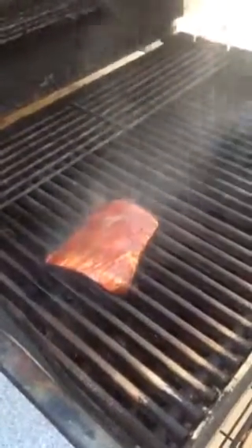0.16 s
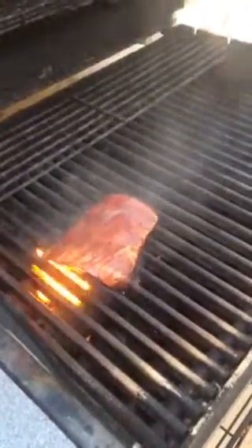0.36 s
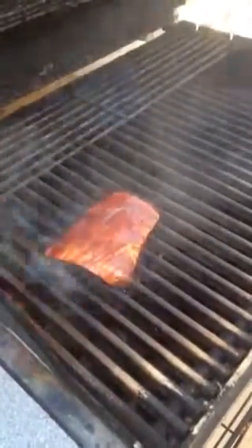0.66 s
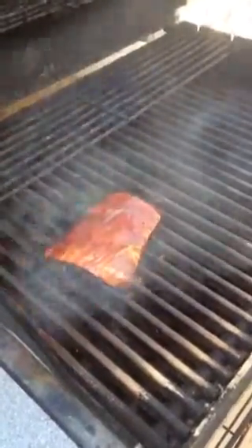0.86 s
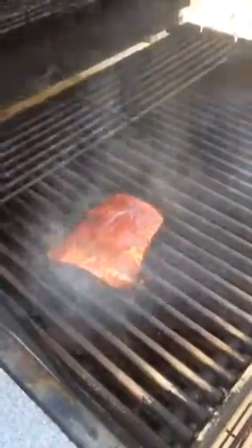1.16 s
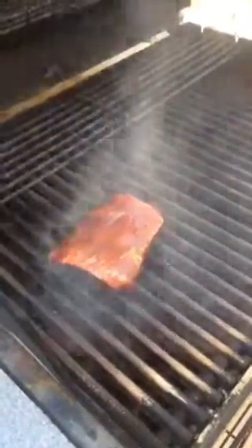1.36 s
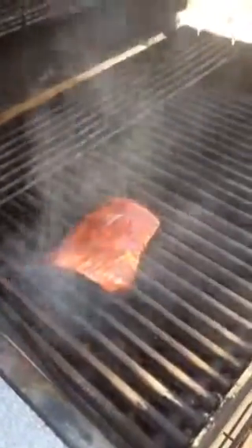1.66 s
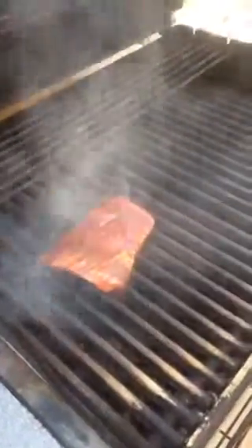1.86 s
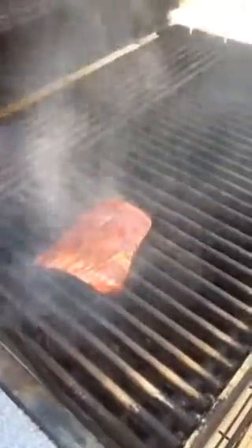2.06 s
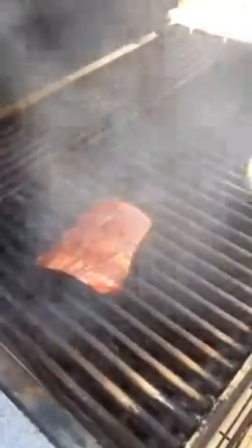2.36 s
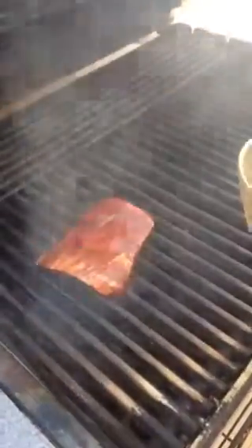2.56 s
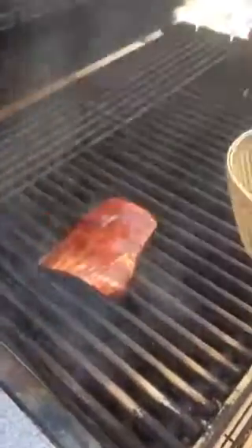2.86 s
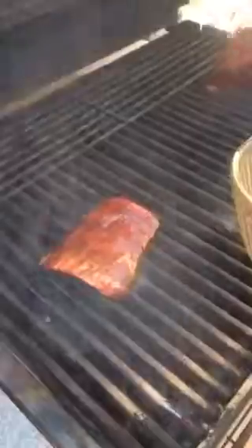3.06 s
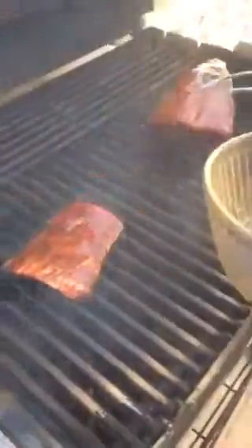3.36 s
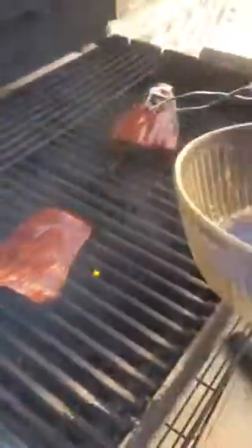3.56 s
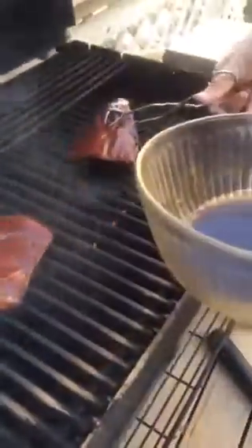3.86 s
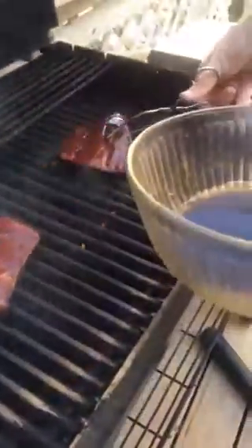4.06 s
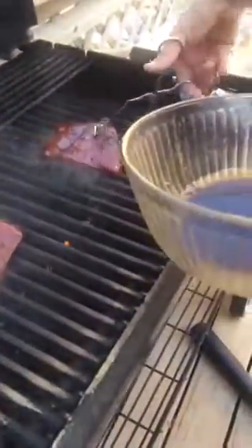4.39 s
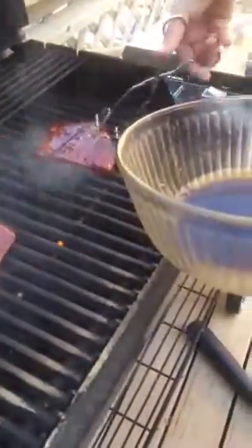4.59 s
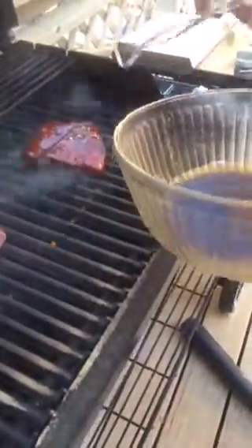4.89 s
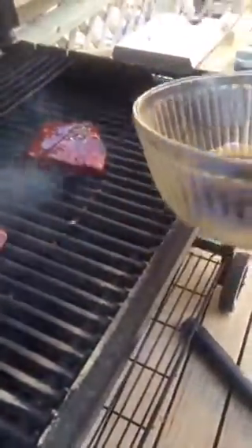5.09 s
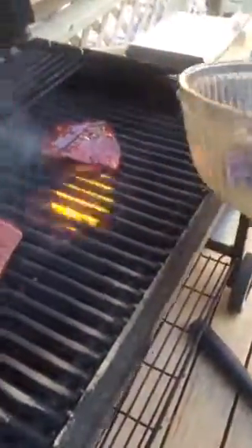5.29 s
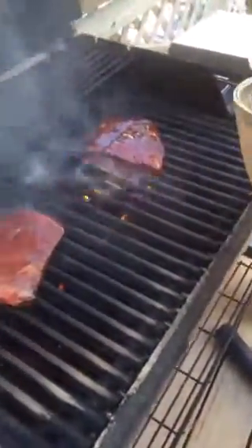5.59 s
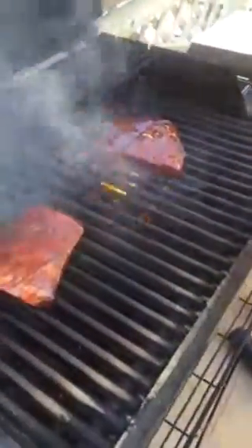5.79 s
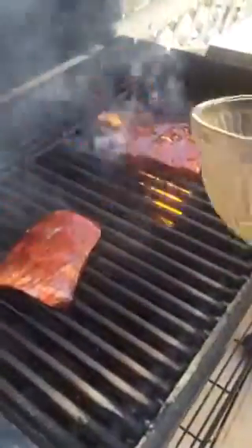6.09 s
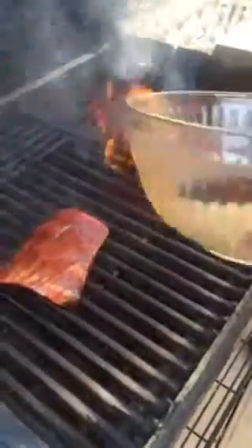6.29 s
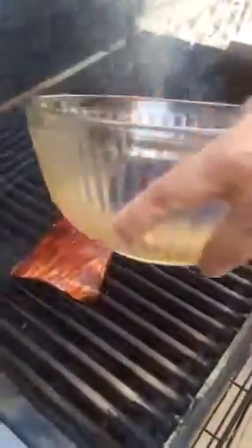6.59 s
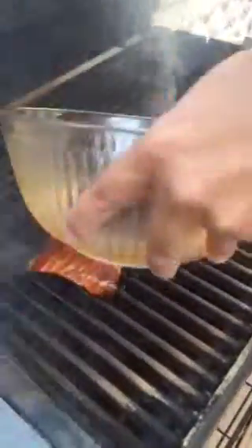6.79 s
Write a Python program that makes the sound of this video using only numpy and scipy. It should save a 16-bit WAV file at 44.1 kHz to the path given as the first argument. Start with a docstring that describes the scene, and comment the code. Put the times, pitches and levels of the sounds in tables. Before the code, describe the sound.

Meat sizzles throughout on an open outdoor gas grill, a dense crackle and fine hiss heard from just above, with faint fluttering flames and low wind rumble on the microphone. In the first half second, tongs clink quickly on a bowl and dripping fat flares with a ringing crackle. A few small spits and faint, thin steam hisses follow, while the sizzle slowly eases. A puff of wind thumps the microphone at about 3.3 seconds. At 3.5 seconds a second piece goes on the bars, and the sizzle swells over the next second, becoming clearly louder. Soft, dull handling knocks come near 3.2, 4.2 and 5.7 seconds. From about 5.3 seconds fat flares repeatedly, with fluttering flames, surges of crackle and frequent sharp pops, strongest around 5.7 to 6 seconds. Another wind puff hits at 6.3 seconds, and the sizzling and spitting continue to the end, near 7 seconds.

```python
"""Meat sizzles on an open gas grill: countless tiny steam bursts crackle and fizz, and narrow jets hiss,
over fluttering flames, hot air in the firebox and wind rumbling on the microphone. In the first half
second tongs clink on a bowl and dripping fat flares with a ringing crackle; scattered puffs of wind,
louder spits and dull knocks follow. At 3.5 s a second piece is laid on the bars and its sizzle swells
as it settles. From 5.3 s fat flares up again and again, amid frequent spits."""
import sys
import numpy as np
from scipy import signal
from scipy.fft import rfft, irfft
from scipy.io import wavfile

SR = 44100
rng = np.random.default_rng(int(sys.argv[2]) if len(sys.argv) > 2 else 0)


def persist_wave(psi):
    """Save psi, clipped to +-1, as 16-bit WAV."""
    counts = np.round(np.clip(psi, -1, 1) * 32767).astype(np.int16)
    wavfile.write(sys.argv[1], SR, np.atleast_2d(counts).T)


N = 306054
TIME = np.arange(N) / SR


def gain_of(db):
    """Amplitude ratio of a level in decibels."""
    return 10 ** (np.asarray(db) / 20)


def unit_rms(x):
    """Normalisation to unit mean power."""
    return x / np.sqrt(np.mean(x ** 2) + 1e-20)


def level_curve(rows):
    """Linear interpolation of (t/s, level/dB) rows at every sample."""
    return np.interp(TIME, *np.transpose(rows))


def add(mix, start_s, sound):
    """Superposition: a sound joins the mix at its start time."""
    part = mix[max(round(start_s * SR), 0):][:len(sound)]
    part += sound[:len(part)]


def coloured(x, spectrum, size=4096):
    """Minimum-phase filtering by (f/Hz, level/dB) rows: each click rings only after its onset."""
    hz, db = np.transpose(spectrum)
    bin_hz = abs(np.fft.fftfreq(size, 1 / SR))
    log_gain = np.log(gain_of(np.interp(np.log(bin_hz + 1), np.log(hz + 1), db)))
    ring = np.fft.ifft(np.exp(np.conj(signal.hilbert(log_gain)))).real
    return signal.oaconvolve(x, ring[:size // 2])[:len(x)]


def band(x, hz, kind, order=4):
    """Maximally flat low-, high- or band-pass filtering."""
    return signal.sosfilt(signal.butter(order, hz, kind, fs=SR, output="sos"), x)


def wander(slow_hz, fast_hz):
    """A 1/f fluctuation of rms 1: equal power per octave between two rates."""
    hz = np.fft.rfftfreq(N, 1 / SR) + 1e-3
    spectrum = rfft(rng.standard_normal(N)) * (hz > slow_hz) * (hz < fast_hz) / np.sqrt(hz)
    return unit_rms(irfft(spectrum, N))


def bursts(per_s, spread_db, cap_db, hiss_db):
    """Shot noise: independent clicks with exponentially distributed levels, over smooth hiss."""
    size = gain_of(np.minimum(spread_db * rng.exponential(1, N), cap_db)) * rng.choice([-1, 1], N)
    clicks = unit_rms(size * (rng.random(N) < per_s / SR))
    return unit_rms(clicks + gain_of(hiss_db) * rng.standard_normal(N))


# Seared and fresh piece: first touch t/s, settling time/s, crackle/dB, spray/dB, drying loss/dB
MEAT_PIECES = [(-1.0451, 1.52, -45.5, -58, 6.5), (3.5, 1.23, -38.5, -54, 7)]

def pieces():
    """Evaporation: each piece's crackle and spray amplitudes grow with contact area and sink as it dries."""
    drying_s, spray_loss_share = 1.86, 0.57
    crackle, spray = [], []
    for touch_s, settle_s, crackle_db, spray_db, loss_db in MEAT_PIECES:
        contact = np.clip((TIME - touch_s) / settle_s, 0, 1) ** .8  # a little less than proportional
        settled_s = np.maximum(TIME - touch_s - settle_s, 0)
        dried_db = loss_db * (1 - np.exp(-settled_s / drying_s))
        crackle.append(contact * gain_of(crackle_db - dried_db))
        spray.append(contact * gain_of(spray_db - spray_loss_share * dried_db))
    return crackle, spray


# Crackle spectra of the seared piece, the fresh piece and flaring fat: f/Hz, relative level/dB
SEARED_CRACKLE = [(500, -24), (1000, -14), (1110, -9.5), (1220, -11), (1450, -7), (1650, -9), (2250, -8.5),
                  (2420, -2), (2600, .5), (3000, -5), (3500, -10.5), (3950, -16.5), (4600, -15.5),
                  (5300, -22)]
FRESH_CRACKLE = [(500, -40), (940, -26), (1120, -16), (1300, -20.5), (1550, -14), (1690, -17.5),
                 (1850, -11.5), (2340, -8), (2650, 0), (2930, -1.5), (3130, -9.5), (3700, -17),
                 (4550, -16.5), (5300, -23)]
FAT_CRACKLE = [(940, -28), (1150, -15), (1370, -21), (1600, -14), (1720, -20), (1870, -11.5), (2520, -7.5),
               (2680, 0), (2810, .5), (2990, -4.5), (3110, -12), (3850, -21.5), (4300, -20), (5300, -27)]
# Spectra of the fine spray from each piece: f/Hz, relative level/dB
SEARED_SPRAY = [(5000, 1), (7200, 1), (9700, -1), (11500, -4.5), (15300, -8)]
FRESH_SPRAY = [(5000, -1), (6200, 0), (7000, 1), (9000, -4.5), (11700, -12), (15300, -20)]
# Brief dips in the treble fizz: t/s, relative level/dB
FIZZ_DIPS = [(1.8, 0.5), (2.13, -3.6), (2.45, 0.5), (3.05, 0.5), (3.31, -5.5), (3.48, 0), (3.68, -3),
             (3.95, 1)]

def sizzle(meat, mist, fat):
    """Filtered shot noise: steam bubbles burst in clusters under a denser, steadier fine spray."""
    clusters, crackle, fizz = wander(3.7, 60), 0, 0
    for strength, colour in zip([*meat, fat], [SEARED_CRACKLE, FRESH_CRACKLE, FAT_CRACKLE]):
        bubbles = band(bursts(per_s=3000, spread_db=4.5, cap_db=12.5, hiss_db=-2), 5100, "low", order=8)
        crackle += strength * unit_rms(coloured(bubbles, colour))
    seared_mist, fresh_mist = mist
    fatty_mist = np.hypot(fresh_mist, gain_of(-19.5) * fat)  # flaring fat adds a faint spray
    for strength, colour in [(seared_mist, SEARED_SPRAY), (fatty_mist, FRESH_SPRAY)]:
        spray = band(bursts(per_s=7000, spread_db=1.0, cap_db=3, hiss_db=-4.5), 4680, "high", order=8)
        fizz += strength * unit_rms(coloured(spray, colour))
    return crackle * gain_of(0.44 * clusters) + fizz * gain_of(level_curve(FIZZ_DIPS) + 0.35 * clusters)


# Steam squeezed from under the meat: t/s, duration/s, level/dB, start f/Hz, end f/Hz
STEAM_JETS = [(.0, 0.18, -57, 3790, 3300), (0.679, 0.18, -58, 4500, 3720), (2.598, 0.72, -66, 4470, 4400)]

def steam_jets():
    """Turbulent jets: narrow bands of noise sink in pitch as the steam pressure drops."""
    out = np.zeros(N)
    for start_s, length_s, db, start_hz, end_hz in STEAM_JETS:
        hz = np.linspace(start_hz, end_hz, round(length_s * SR))
        turbulence = unit_rms(band(rng.standard_normal(N), 220, "low", order=2))[:len(hz)]
        hiss = unit_rms(turbulence * np.sin(2 * np.pi * np.cumsum(hz) / SR))
        add(out, start_s, gain_of(db) * hiss * signal.windows.tukey(len(hz), .5))
    return out


# Spectra of the flames and of the hollow firebox: f/Hz, relative level/dB
FLAME_SPECTRUM = [(60, -30), (120, -8.5), (165, 2), (225, -0.5), (280, -8), (360, -14.5), (480, -12),
                  (650, -16), (900, -16), (1150, -7), (1350, -10), (1900, -7), (3000, -36)]
FIREBOX_SPECTRUM = [(400, -23), (540, -10.5), (650, 1.5), (740, 2), (850, -2), (1000, -5.5), (1300, -30)]
# Draught of hot air through the firebox: t/s, level/dB
DRAUGHT_LEVEL = [(0, -62.5), (.9, -62), (1.35, -58), (1.9, -59.5), (2.15, -56.5), (2.8, -65.5), (3.6, -68),
                 (6.94, -62)]

def flames(flare, fresh_crackle):
    """Combustion noise and cavity resonance: flames flutter and hot air rushes through the firebox."""
    flutter = bursts(per_s=1000, spread_db=-0.5, cap_db=8, hiss_db=-13.0)
    flutter = unit_rms(coloured(flutter, FLAME_SPECTRUM))
    rush = unit_rms(coloured(rng.standard_normal(N), FIREBOX_SPECTRUM))
    burner, drip_flames = gain_of(-64), gain_of(-21) * fresh_crackle
    fire = np.sqrt(burner ** 2 + drip_flames ** 2 + flare ** 2)
    draught = np.hypot(gain_of(level_curve(DRAUGHT_LEVEL)), gain_of(-18) * flare)  # flares draw air
    return flutter * fire * gain_of(2.4 * wander(7, 45)) + rush * draught * gain_of(wander(1.5, 34))


# Wind on the microphone: t/s, level/dB
WIND_LEVEL = [(0, -56.5), (.27, -52), (.6, -58.5), (1.4, -55.5), (2.15, -57), (2.52, -61), (3.2, -55.5),
              (3.55, -60.5), (4.03, -58), (4.17, -67), (5.05, -59.5), (5.75, -57), (5.93, -52),
              (6.2, -57.5), (6.72, -60.5), (6.94, -55.5)]
# Spectrum of its rumble: f/Hz, relative level/dB
WIND_SPECTRUM = [(12, -40), (20, -29), (29, -60), (39, 0.5), (65, 1), (125, -1), (330, -25), (430, -17.5),
                 (730, -120)]
# Single eddies: centre t/s, peak level/dB, f/Hz
EDDIES = [(0.361, -37, 172), (2.109, -36, 127), (3.2968, -19, 86), (3.384, -29, 84), (6.3143, -23, 114),
          (6.3508, -30.5, 153), (6.3623, -23.5, 74.4)]

def wind():
    """Turbulent pressure on the microphone: a lumpy rumble, and eddies that puff for about one cycle."""
    rumble = unit_rms(coloured(rng.standard_normal(N), WIND_SPECTRUM))
    out = rumble * gain_of(level_curve(WIND_LEVEL) + 1.3 * wander(2.9, 25))
    t = TIME[:SR // 10] - .05
    for centre_s, db, hz in EDDIES:
        puff = -np.cos(2 * np.pi * hz * t) * np.exp(-(hz * t / 0.49) ** 2)
        add(out, centre_s + t[0], gain_of(db) * puff)
    return out


# Tong touches on the bowl; at 0.355 s, flaring fat's narrow ringing crackle:
# t/s, level/dB, favoured f/Hz, roll-off about it/(dB per octave)
RING_EVENTS = [(.1686, -26.5, 3400, 12), (0.1734, -29, 2700, 13), (.2132, -19, 4500, 5.5),
               (.2548, -26.5, 2610, 20), (0.355, -31, 2580, 32), (0.4101, -21.5, 3260, 6.5),
               (0.436, -33, 2550, 24)]
# Modes of tongs and bowl, which also voice that crackle: f/Hz, relative level/dB, T60/s
RING_MODES = [(724, -6.5, 0.066), (1138, -9, .085), (1340, -14, 0.1), (2088, -14, 0.31), (2464, -4, 0.067),
              (2540, -11.5, 0.14), (2600, -6, 0.048), (3100, -5, 0.03), (3240, -10, 0.045),
              (3900, -17, 0.044), (4547, -0.5, 0.042), (6190, -19, 0.068)]

def clinks_and_ringing_crackle():
    """Modal ringing: each tong touch, and one crackle of fat, stresses some modes and adds brief noise."""
    out, t = np.zeros(N), TIME[:SR // 3]
    hz, mode_db, t60 = np.transpose(RING_MODES)[:, :, None]
    noise_spectrum = [(200, -26), (600, -2.0), (3000, 5), (5200, -10.0), (15000, -20.5)]
    attack = 1 - np.exp(-t / 0.0014)
    for start_s, db, favoured_hz, rolloff_db in RING_EVENTS:
        cycles = hz * t + rng.random(hz.shape)
        excited_db = mode_db - rolloff_db * abs(np.log2(hz / favoured_hz))
        ring = (gain_of(excited_db - 60 * t / t60) * np.sin(2 * np.pi * cycles)).sum(0)
        noise = unit_rms(coloured(rng.standard_normal(len(t)), noise_spectrum))
        noise *= gain_of(-6.5 - 0.46 * rolloff_db - 60 * t / 0.044)  # narrow rings carry less noise
        add(out, start_s, gain_of(db) * (ring + noise) * attack)
    return out


# Dripping fat catches fire: t/s, burning time/s, flame level/dB, crackle level/dB
FAT_FLARES = [(.335, 0.092, -51, -44.5), (1.24, .08, -61, -51), (5.27, 0.21, -46.5, -42.5),
              (5.51, 0.21, -50, -38.3), (5.735, 0.043, -49, -33.5), (5.85, 0.4, -44, -36.5),
              (6.085, 0.043, -47, -38.5), (6.4, 0.19, -52, -44), (6.828, .12, -48, -46)]

def flares():
    """Incoherent addition: the flame and crackle envelopes of overlapping flares sum in power."""
    attack_s, flame_release_s, fat_release_s = 0.027, 0.12, 0.049
    flame_power, fat_power, t = np.zeros(N), np.zeros(N), TIME[:SR]
    caught = np.minimum(t / attack_s, 1)
    for start_s, burn_s, flame_db, fat_db in FAT_FLARES:
        spent_s = np.maximum(t - burn_s, 0)
        add(flame_power, start_s, (gain_of(flame_db) * caught * np.exp(-spent_s / flame_release_s)) ** 2)
        add(fat_power, start_s, (gain_of(fat_db) * caught * np.exp(-spent_s / fat_release_s)) ** 2)
    return np.sqrt(flame_power), np.sqrt(fat_power)


# Loud spits of fat: t/s, peak level of the pop/dB, snap relative to the pop/dB, T60/s
FAT_SPITS = [(.590, -34, -18, .025), (.6065, -32, -20, .014), (.680, -30, -20, .05), (1.027, -34, -14, .02),
             (1.999, -34, -18, .015), (4.026, -33, -16, .015), (4.318, -35, -18, .012),
             (5.150, -28, -18, .02), (5.1925, -29, -18, .025), (5.425, -27, -20, .008),
             (5.555, -27, -16, .015), (5.669, -22, -11, .012), (5.7355, -24, -20, .006),
             (5.761, -20, -26, .025), (5.860, -27, -18, .03), (5.9145, -21, -13, .016),
             (6.3405, -28, -20, .015), (6.5383, -24.5, -11, .016), (6.5735, -30, -18, .012),
             (6.8623, -24, -20, .012)]

def spits():
    """Impulsive excitation: a large drop bursts in a click and decaying spray, a pop with a bright snap."""
    out, t = np.zeros(N), TIME[:SR // 15]
    for start_s, db, snap_db, t60 in FAT_SPITS:
        burst = (rng.standard_normal(len(t)) + 2 * (t == 0)) * gain_of(-60 * t / t60)
        pop = coloured(band(burst, 5100, "low"), FRESH_CRACKLE)
        snap = coloured(band(burst, 5100, "high"), SEARED_SPRAY)
        add(out, start_s, gain_of(db) * (pop / abs(pop).max() + gain_of(snap_db) * snap / abs(snap).max()))
    return grill_echo(out, t60=0.12, echo_db=-11)


def grill_echo(x, t60, echo_db):
    """Scattering: lid and walls return sparse reflections that decay exponentially."""
    t = TIME[:SR // 5]
    taps = rng.standard_normal(len(t)) * (rng.random(len(t)) < .05) * (t > .002) * gain_of(-60 * t / t60)
    return x + gain_of(echo_db) * signal.oaconvolve(x, taps / np.linalg.norm(taps))[:len(x)]


# Dull knocks of handling: t/s, peak level/dB
HANDLING_KNOCKS = [(.977, -62), (3.191, -46), (4.155, -43), (5.0993, -49), (5.6685, -36)]

def knocks():
    """Heavily damped impacts: each soft bump is a short burst of low noise."""
    out, t = np.zeros(N), TIME[:SR // 10]
    for start_s, db in HANDLING_KNOCKS:
        thud = band(rng.standard_normal(len(t)) * gain_of(-60 * t / .025), [220, 1100], "band", order=2)
        add(out, start_s, gain_of(db) * thud / abs(thud).max())
    return out


def scene():
    """Superposition: all sources add at one microphone held over the grill."""
    meat, mist = pieces()
    flare, fat = flares()
    cooking = sizzle(meat, mist, fat) + spits() + steam_jets() + flames(flare, fresh_crackle=meat[1])
    return (cooking + wind() + clinks_and_ringing_crackle() + knocks())[None]


def record(dry):
    """Band limiting: a linear-phase low-pass removes the highest treble."""
    cutoff_hz = 15450
    lowpass = signal.firwin(511, cutoff_hz, window=("kaiser", 9), fs=SR)
    return signal.oaconvolve(dry, lowpass[None], "same")


dry = scene()
out = record(dry)
persist_wave(out)
```